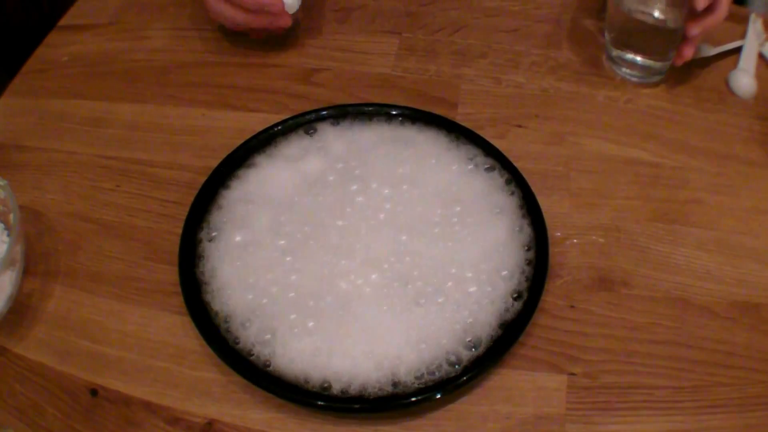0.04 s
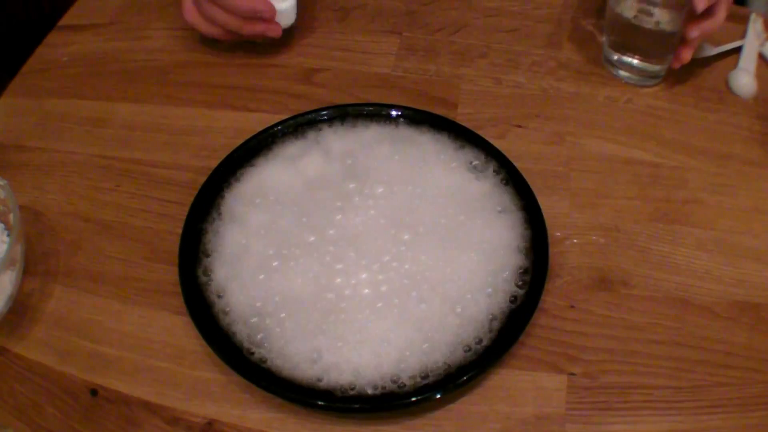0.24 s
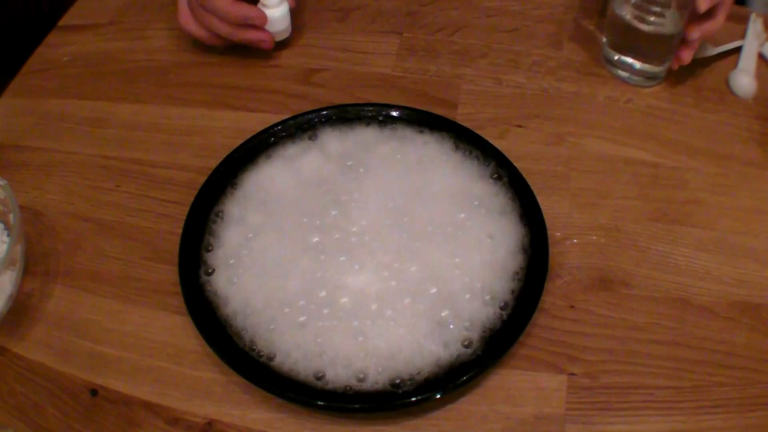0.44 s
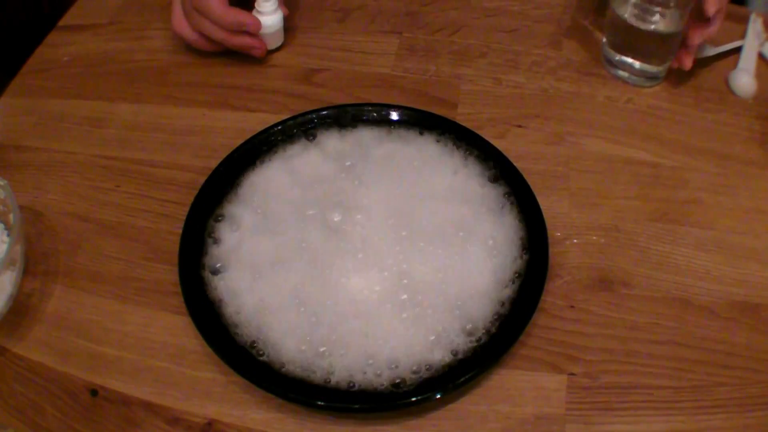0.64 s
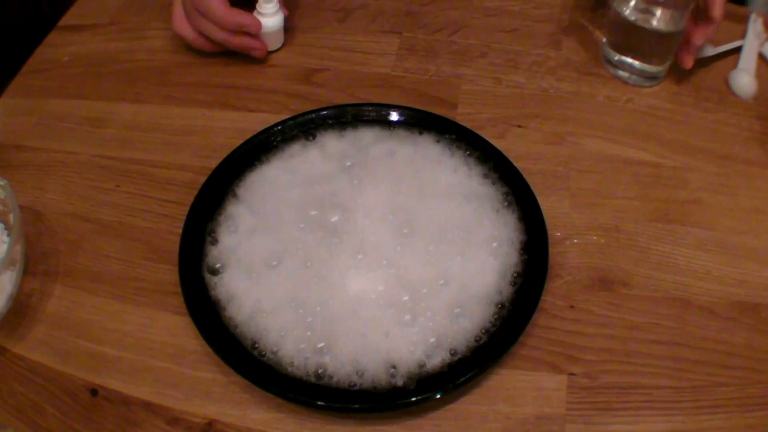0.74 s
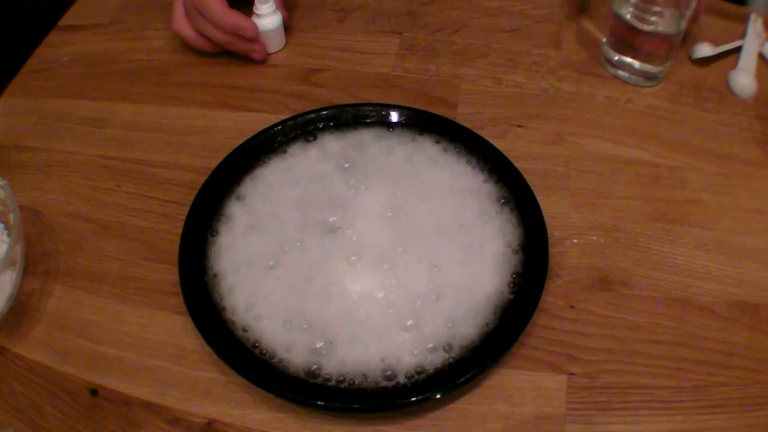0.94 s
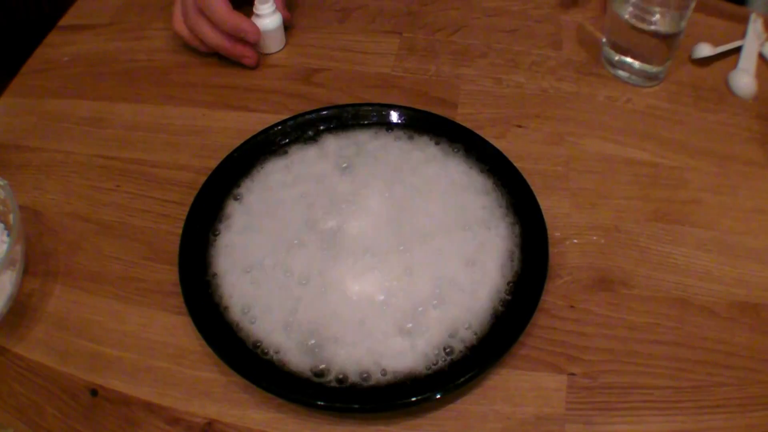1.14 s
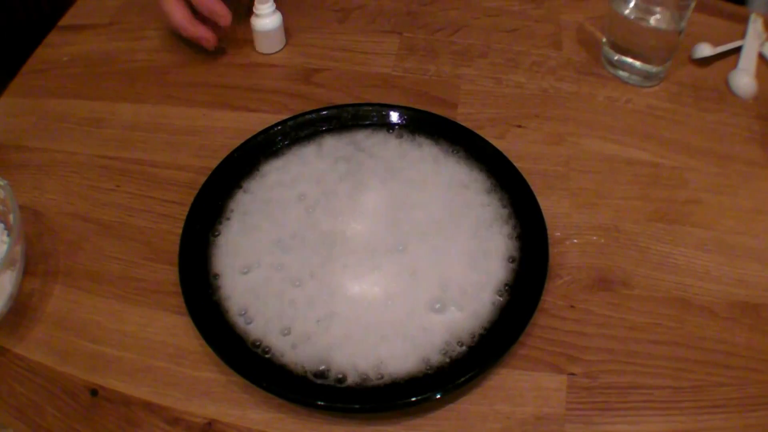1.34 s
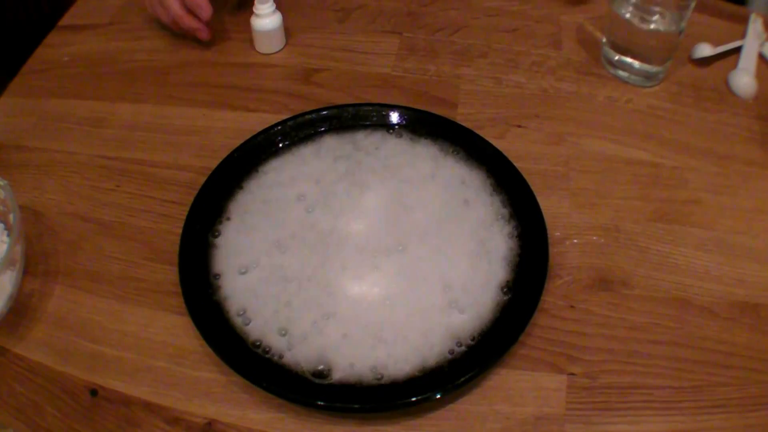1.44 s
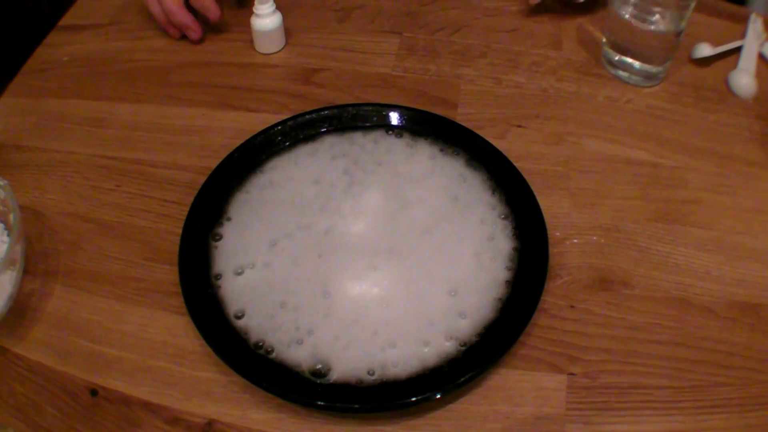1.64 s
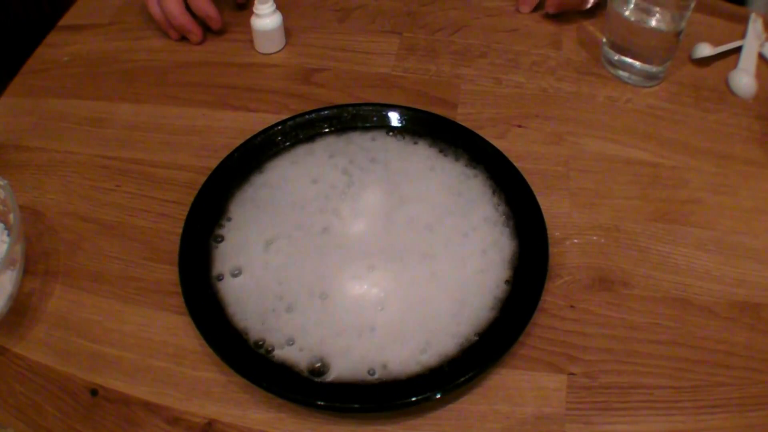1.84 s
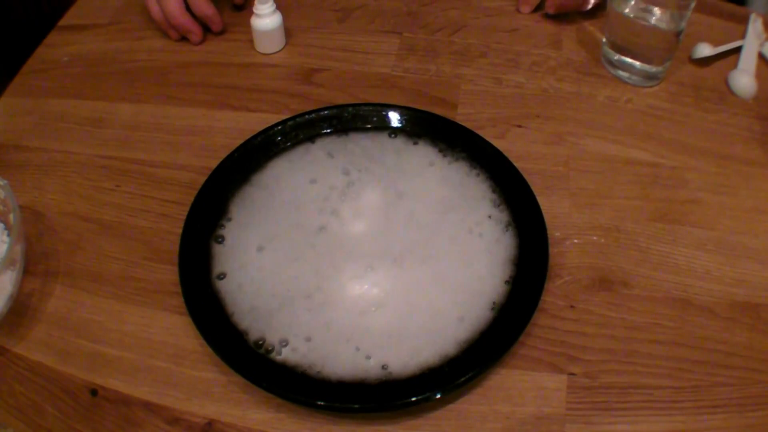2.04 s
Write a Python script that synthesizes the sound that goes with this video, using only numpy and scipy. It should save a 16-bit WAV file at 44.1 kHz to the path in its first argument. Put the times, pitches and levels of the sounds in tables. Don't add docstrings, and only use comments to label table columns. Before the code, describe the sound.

Foam fizzes throughout, a dense bright hiss of tiny bursting bubbles. A glass is set down hard on a wooden table at about 0.2 seconds, then again, edge first and sharper, at 0.45, with hollow wood ringing and short room echo. A very faint tap comes near 1.0. Small bubble blips follow, and coarser fizz swells from 1.5 to 2 seconds. Low room hum, slightly thin, resonant stereo camera sound.

```python
import sys
import numpy as np
from scipy import signal
from scipy.fft import rfft, irfft, next_fast_len
from scipy.io import wavfile
from scipy.ndimage import uniform_filter1d, map_coordinates

SR = 44100
rng = np.random.default_rng(int(sys.argv[2]) if len(sys.argv) > 2 else 0)


def dump(signal):
    limited = np.clip(np.atleast_2d(signal).T, -1, 1)
    pcm = np.round(limited * 32767).astype(np.int16)
    wavfile.write(sys.argv[1], SR, pcm)


def how_loud(loudness_db):
    steps = np.asarray(loudness_db, float) / 20
    return 10 ** steps


N = 92610


def unit(x):
    return x / np.sqrt(np.mean(x ** 2) + 1e-20)


def along(points, hz):
    f, v = np.transpose(points)
    return np.interp(np.log(hz + 1), np.log(f + 1), v)


def curve(rows):
    return np.interp(np.arange(N) / SR, *np.transpose(rows))


def wobble(rate_hz):
    knots = rng.standard_normal(int(N * rate_hz / SR) + 4)
    return map_coordinates(knots, [np.arange(N) * rate_hz / SR])


def filtered(x, response):
    m = next_fast_len(N + SR // 2)
    return irfft(rfft(x, m) * response(np.fft.rfftfreq(m, 1 / SR)), m)[..., :N]


def patchy(pair, patchy_db):
    z = signal.stft(pair, nperseg=512)[2]
    field = uniform_filter1d(rng.standard_normal(z.shape[1:]), size=8, axis=0)
    field = uniform_filter1d(field, size=10, axis=1)
    return signal.istft(z * how_loud(patchy_db * unit(field)), nperseg=512)[1][:, :N]


# frequency_hz, correlation
LIKENESS = [(60, 0.56), (380, 0.5), (1300, 0.52), (2400, 0.49), (4400, 0.47), (8100, 0.34), (11000, 0.79),
            (15000, .15)]


def spread(pair, spectrum):
    def mid_side(hz):
        angle = np.arccos(np.clip(along(LIKENESS, hz), -1, 1)) / 2
        return how_loud(along(spectrum, hz)) * [np.cos(angle), np.sin(angle)]
    mid, side = filtered(pair, mid_side)
    return unit(np.array([mid + side, mid - side]))


# frequency_hz, level_db
RUMBLE_TONE = [(25, -3), (60, -10.5), (110, -7), (220, -2), (295, -4), (420, -3), (560, -13), (900, -27)]
# time_s, level_db
RUMBLE_SWELL = [(.75, -51.5), (1.07, -47.5), (1.1, -53), (1.17, -52.5), (1.42, -53), (1.55, -50),
                (1.85, -51), (2.0, -52.5), (2.1, -54.5)]
# frequency_hz, level_db
STIR_TONE = [(250, -35), (400, 2), (700, 28), (1200, 26), (1700, -72), (2500, -40)]
# time_s, level_db
STIR_SWELL = [(0, -57), (.18, -53), (.8, -60.5), (.93, -58.5), (1.0, -58), (1.1, -56), (1.4, -89),
              (1.7, -75), (2.1, -79)]


def hum():
    noise = patchy(rng.standard_normal((2, N)), patchy_db=2.34)
    rumble = spread(noise, [(10, -60)] + list(RUMBLE_TONE) + [(2000, -66)])
    stir = spread(patchy(rng.standard_normal((2, N)), patchy_db=-7.0), STIR_TONE)
    rumble_gain = how_loud(curve(RUMBLE_SWELL) + 1.9 * wobble(40.13))
    return rumble_gain * rumble + how_loud(curve(STIR_SWELL) + 1.0 * wobble(24)) * stir


# pitch_hz, level_db (rms)
MOTOR_LINES = [(109, -67.5), (232, -67), (294, -58.5)]


def motor():
    t, out = np.arange(N) / SR, 0
    for hz, db in MOTOR_LINES:
        phase = 2 * np.pi * hz * t + 0.7 * wobble(12)
        out = out + how_loud(db + 2.5 + 3.6 * wobble(13.94)) * np.sin(phase)
    return out


# frequency_hz, level_db
SPRAY_TONE = [(9000, -38), (11500, 9), (13000, -5), (15000, 0), (16500, -22)]
# time_s, level_db
SPRAY_GUSTS = [(0, -73), (.4, -81), (.7, -66), (1.2, -63), (1.7, -64), (2.1, -66)]


def spray():
    gain = how_loud(curve(SPRAY_GUSTS) + 2.5 * wobble(14))
    return gain * spread(rng.standard_normal((2, N)), SPRAY_TONE)


def bursts(count, low_hz, high_hz, cycles, size_db):
    u, t = rng.random((2, count, 3)), np.arange(96) / SR
    hz = (low_hz + (high_hz - low_hz) * u[..., 1])[..., None]
    size = how_loud(-size_db * np.log(1 - u[..., 2]))[..., None] * np.sqrt(hz / high_hz)
    grain = size * np.exp(-t * hz / cycles) * np.sin(2 * np.pi * hz * t)
    at = (u[..., 0] * N).astype(int)[..., None] + np.arange(96)
    streams = [np.bincount(a.ravel(), g.ravel(), N + 96)[:N] for a, g in zip(at, grain)]
    return unit(np.array(streams))


# time_s, level_db
FINE_ACTIVITY = [(0.0, -46.5), (1.77, -46.5), (1.87, -48.5), (2.0, -46), (2.1, -46)]
# frequency_hz, level_db
FINE_TONE = [(600, -11), (1200, -5), (1900, -7.5), (3200, -4), (5000, -4.5), (7000, -3.5), (10500, -1.5),
             (12000, -15.5),
             (14900, -27), (15400, -29), (16500, -30)]
# time_s, level_db
LARGE_SURGE = [(0, -55.5), (.3, -48.5), (.7, -56), (1.3, -79), (1.55, -48.5), (1.75, -45.5), (1.95, -42),
               (2.1, -42)]
# frequency_hz, level_db
LARGE_TONE = [(1400, -29.5), (2100, -9.5), (2800, -7), (3500, -5.5), (4300, -9), (5500, -21), (6800, -22),
              (9000, -31)]


def foam():
    fine = 0.49 * bursts(count=16000, low_hz=844, high_hz=15740, cycles=4, size_db=2.2)
    fine = patchy(fine + rng.standard_normal((2, N)), patchy_db=1.05)
    large = 0.72 * bursts(count=4000, low_hz=1966, high_hz=5090, cycles=12, size_db=0.5)
    large = patchy(large + rng.standard_normal((2, N)), patchy_db=-0.05)
    fine_gain = how_loud(curve(FINE_ACTIVITY) + 4.5 + 0.16 * wobble(8.8))
    large_gain = how_loud(curve(LARGE_SURGE) + 0.86 * wobble(22))
    return fine_gain * spread(fine, FINE_TONE) + large_gain * spread(large, LARGE_TONE)


# start_s, pitch_hz, level_db
BIG_BUBBLES = [
    (.975, 1284, -49.5),
    (1.047, 1490, -50),
    (1.175, 1520, -50),
    (1.562, 1230, -50),
    (1.751, 1140, -48),
    (2.006, 1900, -51),
]


def blips():
    length_s, rise = 0.019, 0.11
    out, u = np.zeros(N + SR), np.linspace(0, 1, round(length_s * SR))
    for s, hz, db in BIG_BUBBLES:
        phase = 2 * np.pi * np.cumsum(hz * (1 + rise * (u - .5))) / SR
        out[round(s * SR):][:len(u)] += how_loud(db) * np.sin(np.pi * u ** 0.65) * np.sin(phase)
    return out[:N]


# frequency_hz, t60_s
ROOM_T60 = [(60, 0.27), (250, 0.13), (600, 0.47), (1200, 0.37), (3000, 0.28)]


def room(x):
    rise_s = 0.021
    hz, t, z = signal.stft(rng.standard_normal((2, SR * 3 // 4)), SR, nperseg=256)
    decay = how_loud(-60 * t / along(ROOM_T60, hz)[:, None])
    a, b = signal.istft(z * decay, SR, nperseg=256)[1]
    rise = 1 - np.exp(-np.arange(len(a)) / SR / rise_s)
    tail = np.array([a + 0.3 * b, a - 0.21 * b]) * rise
    delayed = np.pad(x, (200, 0))[None]
    return signal.fftconvolve(delayed, tail / np.linalg.norm(tail[0]), axes=1)


# start_s, level_db (peak), contact_ms, setting_down (0 or 1)
CONTACTS = [
    (0.2055, -9, 0.63, 0),
    (0.4289, -18.5, 2.6, 0),
    (0.447, -6.5, 0.42, 1),
    (.982, -40.5, 1.1, 0),
]
# pitch_hz, level_db, t60_s
FIRST_MODES = [(173, 0.5, 0.57), (256.3, 16, 0.097), (368, 4, 0.31), (393.4, -14, 0.12), (517, 2, 2.5),
               (570, 8.5, 0.65), (755, 0, 1.1), (768, -5.5, 5.0), (940, -8, 0.42), (972, -5.5, 0.11),
               (1167, -5, 0.11), (1156, -10, 0.6)]
# pitch_hz, level_db, t60_s
EDGE_MODES = [(174, -7, 0.6), (261.5, 4.5, 0.27), (394, -42, 0.19), (535, -1.5, 5.0), (632, -3.5, 0.91),
              (761, -2, 0.65), (828, -3.5, 0.25), (1002, -1, 0.19), (1138, -14, 1.5), (1243, -13.5, 0.5),
              (1305, -10, 0.14), (1612, -17, 0.75)]


def glass():
    attack_s, early_s, longest_s, late_db, beats_hz, room_db = .002, .07, .45, -11, 44.8, 3
    out, t = np.zeros((2, N + 2 * SR)), np.arange(SR * 3 // 4) / SR
    rise = 1 - np.exp(-t / attack_s)

    def tone(hz, db, t60):
        return how_loud(db - 60 * t / t60) * np.sin(2 * np.pi * hz * t)

    for s, db, contact_ms, which in CONTACTS:
        early, late = 0, 0
        for hz, level, t60 in (FIRST_MODES, EDGE_MODES)[round(which)]:
            early = early + tone(hz, level, early_s)
            beating = 1 + 18 * t * wobble(beats_hz)[:len(t)]
            late = late + tone(hz, level + late_db, min(t60, longest_s)) * beating
        top = np.abs(early).max()
        blow = early / top + tone(1900, -6.5, 0.0054)
        thud = tone(490, 10, .012)
        push = np.exp(-np.arange(400) / (SR * contact_ms / 8000))
        push = np.convolve(push, push)

        def soft(x):
            return how_loud(db) * np.convolve(x * rise, push / push.sum())

        direct = soft(blow + thud + late / top)[:len(t)]
        wet = how_loud(room_db) * room(soft(blow + 0.4 * thud)[:SR // 10])
        out[:, round(s * SR):][:, :len(t)] += direct
        out[:, round(s * SR):][:, :wet.shape[1]] += wet
    return out[:, :N]


# frequency_hz, level_db
LEFT_LEVEL = [(60, 14), (130, 1.5), (290, 0.5), (640, 3), (1410, -1), (3100, 2.0), (6820, 2),
              (15000, -13.5)]
# frequency_hz, phase_rad
LEFT_LEAD = [(4000, 0), (8000, -0.54), (10500, -1.76), (15000, -0.5)]


def lean(hz):
    half = np.array([[.5], [-.5]])
    return how_loud(along(LEFT_LEVEL, hz) * half) * np.exp(1j * along(LEFT_LEAD, hz) * half)


def scene():
    central = motor() + blips() + glass()
    return filtered(hum() + foam() + spray(), lean) + central


def housing(hz):
    def pair(centre_hz, width_hz):
        return centre_hz ** 2 - hz * hz + 1j * hz * width_hz
    bass_cut_hz = 79
    bass_cut = -hz * hz / pair(bass_cut_hz, 1.39 * bass_cut_hz)
    return bass_cut * pair(7862, 36) / pair(7735, 130)


def top_cut(x):
    return signal.sosfilt(signal.butter(12, 15740, fs=SR, output="sos"), x)


def record(dry):
    mix = filtered(dry, housing)
    return top_cut(mix)


dry = scene()
out = record(dry)
dump(out)
```